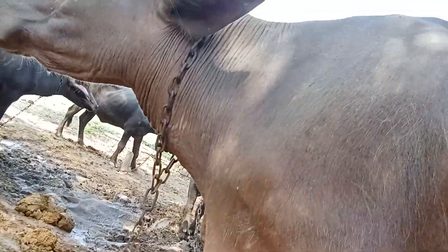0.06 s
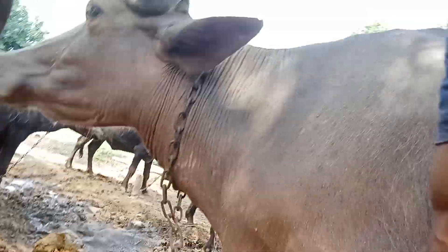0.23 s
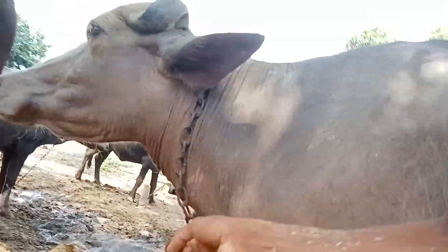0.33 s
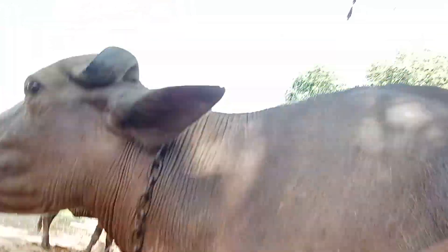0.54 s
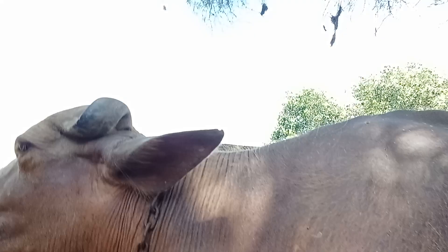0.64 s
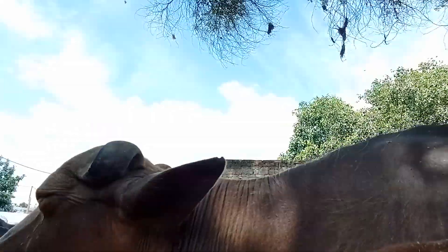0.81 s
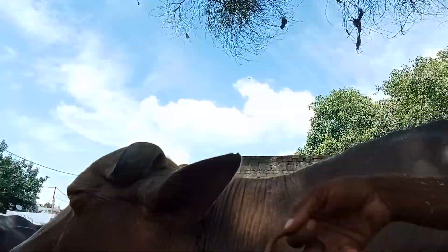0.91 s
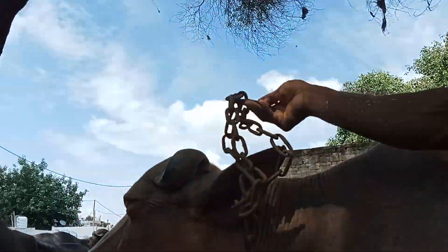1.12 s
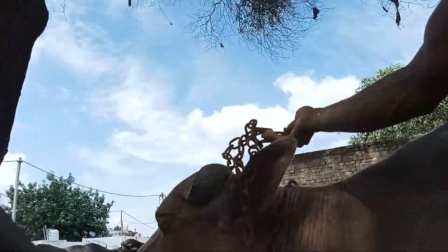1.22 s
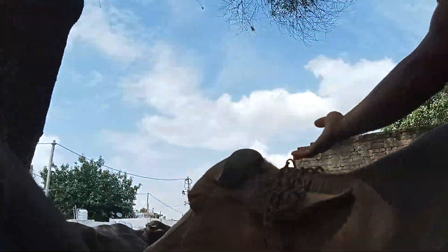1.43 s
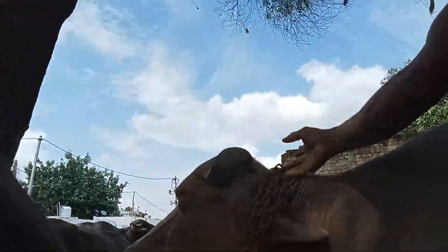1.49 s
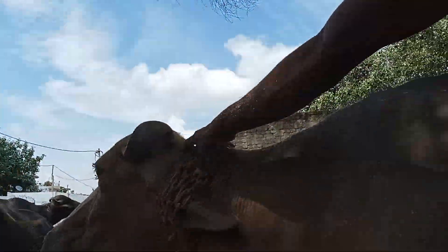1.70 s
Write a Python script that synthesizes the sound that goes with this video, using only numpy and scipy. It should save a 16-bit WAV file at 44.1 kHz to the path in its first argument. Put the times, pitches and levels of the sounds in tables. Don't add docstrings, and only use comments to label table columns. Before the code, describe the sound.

A metal chain rattles and clinks close by, shaken, pulled and tossed in a yard

```python
import sys
import numpy as np
from scipy import signal
from scipy.fft import rfft, irfft
from scipy.io import wavfile

SR = 44100
rng = np.random.default_rng(int(sys.argv[2]) if len(sys.argv) > 2 else 0)


def how_loud(loudness_db):
    steps = np.asarray(loudness_db, float) / 20
    return 10 ** steps


def output_pcm(signal):
    pcm = np.clip(np.atleast_2d(signal).T, -1, 1) * 32767
    wavfile.write(sys.argv[1], SR, np.round(pcm).astype(np.int16))


N = 77175

# start_s, level_db (peak)
SHACKLE_HITS = [(0.0014, -16), (0.0708, -18), (0.1101, -23), (0.1225, -16), (0.1624, -15), (0.1775, -19.5),
                (0.2019, -14.5)]
SLACK_HITS = [(0.2305, -9), (0.3, -29), (0.3868, -8.5), (0.402, -23), (0.5165, -35), (0.5776, -14),
              (0.5948, -12), (0.6072, -15), (0.657, -17.5), (0.6707, -13.5), (0.7031, -23), (0.7221, -14.5),
              (0.752, -20.5), (0.7684, -29.5)]
PULL_HITS = [(0.8044, -19.5), (0.8124, -19), (0.8336, -19.5), (0.864, -20.5), (0.8755, -25), (0.9482, -39),
             (0.9681, -18.5), (0.99, -25), (1.011, -26), (1.0964, -39.5), (1.1282, -30.5), (1.2003, -26.5)]
TOSS_HITS = [(1.213, -10), (1.2512, -17), (1.2554, -10.5), (1.281, -13.5), (1.2924, -16), (1.3202, -23),
             (1.3437, -16), (1.3629, -17), (1.3868, -16.5), (1.4168, -18), (1.4395, -20.5), (1.4636, -14.5)]
SETTLE_HITS = [(1.5152, -28), (1.5379, -22), (1.5723, -23), (1.5894, -32), (1.639, -33.5), (1.6927, -36.5),
               (1.7404, -40)]
# start_s,
# level_db (peak)
SLIPS = [(.2915, -31), (0.5742, -32), (.639, -31.5), (0.665, -27), (.698, -31), (.82, -25.5), (.849, -33),
         (.884, -30), (1.1635, -33)]
# gain_db, or jingle centre pitch_hz
CRACK_GAIN_DB = [-5, -5, 0.5, -1, -7]
TICK_GAIN_DB = [-1, -9, -2, -5.5, 0.5]
JINGLE_GAIN_DB = [-16, -10, -9.5, -14.5, -11.5]
REBOUND_GAIN_DB = [-23, -16, -19, -17, -15.5]
JINGLE_HZ = [11450, 11370, 11400, 12400, 11800]
# start_s, level_db, pitch_hz, t60_s
LINK_RINGS = [(0.001, -40, 14900, 0.2), (0.07, -26.5, 2980, 0.031), (0.071, -27, 12680, 0.044),
              (0.111, -28, 8050, 0.045), (0.123, -30, 10000, 0.056), (0.122, -31, 3120, 0.035),
              (0.123, -27, 14880.0, 0.032), (0.1778, -22.5, 9880, 0.021), (0.203, -18, 3285, 0.023),
              (0.203, -11, 9150, 0.021), (0.232, -27, 9200, 0.049), (0.3, -52, 11700, 0.24),
              (0.301, -48, 10170.0, 0.28), (0.389, -22.5, 11220, 0.21), (0.387, -20, 9490, 0.14),
              (0.388, -22, 9390, 0.3), (0.389, -27, 11850, 0.14), (0.511, -41, 12350, 0.14),
              (0.51, -36.5, 11520, 0.11), (0.58, -29, 9460, 0.27), (0.595, -32, 12370, 0.2),
              (0.609, -21, 11780.0, 0.055), (0.606, -17, 9450, 0.079), (0.659, -29, 9600, 0.12),
              (0.661, -25.5, 11000, 0.21), (0.659, -28.0, 9670, 0.2), (0.722, -40, 8690.0, 0.041),
              (0.723, -27, 10500, 0.07), (0.724, -28, 11700, 0.07), (0.8045, -18, 9460, 0.17),
              (0.864, -27, 9400, 0.09), (0.968, -16.5, 10050, 0.055), (0.97, -19, 11550, 0.034),
              (0.99, -25, 9780, 0.05), (1.0115, -17, 9700, 0.08), (1.011, -21, 11000, 0.1),
              (1.096, -50, 13100, 0.047), (1.128, -16.5, 11240.0, 0.12), (1.127, -15.5, 11430, 0.071),
              (1.164, -38, 8600, 0.022),
              (1.212, -21, 12300, .5), (1.212, -21, 12950, .14), (1.212, -19, 14050, .1),
              (1.217, -32, 9500, .15), (1.257, -18, 13120, .19), (1.257, -23, 13520, .3),
              (1.281, -19, 11200, .04), (1.321, -29, 14050, .09), (1.345, -33, 9750, .2),
              (1.366, -33, 7860, .15), (1.366, -34, 3150, .2), (1.366, -33, 8650, .12),
              (1.366, -24, 13570, .26), (1.383, -17, 13560, .1), (1.383, -27, 12300, .2),
              (1.439, -30, 11150, .05),
              (1.4637, -9.5, 13400, 0.078), (1.493, -45.5, 3310, 0.16), (1.539, -45, 14920.0, 0.095),
                (1.539, -30, 9050, 0.072), (1.541, -35.5, 2884, 0.11), (1.575, -64, 2830, 0.14),
                (1.573, -34.5, 8940, 0.13), (1.588, -39, 14790.0, 0.11), (1.588, -38, 2900, 0.1),
                (1.641, -55, 14780.0, 0.167), (1.641, -42.5, 3280, 0.073), (1.643, -44.5, 9000, 0.14),
              (1.213, -17, 14800, .025), (1.212, -28, 13240, .2), (1.213, -27, 7900, .03),
              (1.251, -17, 11950, .02), (1.268, -16, 13120, .19), (1.2683, -17, 13520, .12),
              (1.261, -32, 9450, .3), (1.293, -24, 9100, .025), (1.305, -29, 9900, .07),
              (1.345, -31, 11050, .1), (1.366, -33, 14870, .2), (1.369, -25, 10070, .025),
              (1.366, -36, 2900, .1), (1.367, -33, 3300, .12), (1.387, -27, 14050, .08),
              (1.387, -34, 14900, .2), (1.392, -23, 13060, .12), (1.421, -33, 11220, .2),
              (1.414, -32, 10000, .1), (1.447, -37, 9500, .12), (1.464, -18, 14940, .045),
              (1.469, -22, 12340, .075), (1.465, -28, 8800, .06), (1.471, -27, 8440, .06),
              (1.465, -27, 14080, .05), (1.478, -33, 11810, .15), (1.54, -36, 7860, .12),
              (1.541, -40, 3320, .08), (0.001, -36, 9950, .15), (0.071, -32, 14950, .09)]
# freq_hz, level_db
CRACK_COLOUR = [(4000, -18.5), (7500, -7.5), (9500, 2.5), (12500, -1.5), (15400, -13)]
TICK_COLOUR = [(800, -14), (2300, -3.5), (4300, 6.5), (7000, -7.5)]
# start_s, level_db (peak), pitch_hz, t60_s
KNOCKS = [
    (0.2311, -8, 3450, 0.022),
    (0.2304, -8.5, 3980, 0.019),
    (0.2335, -16.5, 2200, 0.014),
    (1.2922, -12.5, 4190, 0.013),
    (1.3, -10.5, 2290, 0.0073),
    (1.3, -16, 1050, 0.03),
]
# start_s, level_db (peak), pitch_hz, t60_s
CLATTER = [(0, -28, 93.5, 0.13), (.217, -29.5, 1396, 0.077), (.233, -22.5, 899, .11),
           (0.2317, -23.5, 1246, 0.028), (.236, -24.5, 353, 0.04), (.262, -37, 948, 0.13),
           (.266, -33.5, 1513, 0.038), (.291, -34.5, 956, .12), (.293, -35.5, 449, 0.082),
           (.311, -28.5, 1530, 0.02), (.852, -38.5, 302, 0.096), (0.867, -40, 1643, .045),
           (.903, -33.5, 230, 0.15), (.965, -44.5, 2380, 0.067), (1.2935, -25.5, 545, 0.055),
           (1.303, -26.5, 426, 0.057), (1.3, -23, 3980, 0.011), (1.416, -39, 1070, 0.044),
           (1.521, -38, 74, 0.26)]
# freq_hz, level_db
THUD_COLOUR = [(150, -38), (400, 0.5), (2500, 0.5), (7000, -34)]
# freq_hz, level_db
AIR_COLOUR = [(35, -38), (80, 15), (200, 0.5), (1000, -24.5), (3800, -12), (7000, -42)]
# start_s, level_db
RUB_LEVEL = [(0, -46.5), (.31, -46), (.35, -57.5), (.83, -57), (.9, -49), (.97, -57), (1.3, -54.5),
             (1.75, -58.5)]
# freq_hz, level_db
RUB_COLOUR = [(150, 1), (450, 2), (1200, -4), (6500, -22.5), (11000, -21)]
# multiple (of the turning rate), level_db
ENGINE = [(2, -63.5), (3, -59.5), (4, -59), (5, -57.5)]
# start_s, end_s, pitch_hz, level_db
WHINES = [
    (.54, .8, 710, -61),
    (.85, 1.22, 710, -65),
    (.94, 1.04, 850, -58),
    (1.47, 1.66, 850, -63),
]


def chain():
    stages = [SHACKLE_HITS, SLACK_HITS, PULL_HITS, TOSS_HITS, SETTLE_HITS]
    gains = zip(stages, CRACK_GAIN_DB, TICK_GAIN_DB, JINGLE_GAIN_DB, JINGLE_HZ, REBOUND_GAIN_DB)
    jingles, taps = [], []
    for hits, crack, tick, jingle, hz, rebound in gains:
        for s, db in hits:
            jingles.append((s, db + crack + jingle, hz))
            taps.append((s, db + crack, db + tick))
            for late, weight in rng.random((4, 2)):
                crack_db = db + crack + rebound * (1 + weight)
                tick_db = db + tick + rebound * (0.5 + weight)
                taps.append((s + 0.0064 + 0.035 * late, crack_db, tick_db))
    taps += [(s, db, db) for s, db in SLIPS]
    ringing = rings() + links(jingles)
    cracks = bursts([(s, db, 0.026) for s, db, _ in taps], CRACK_COLOUR)
    ticks = bursts([(s, db, 0.019) for s, _, db in taps], TICK_COLOUR)
    return ringing + cracks + ticks


def rings():
    twin_hz, choke_hz, choke_db_per_s = 118, 450, 1998
    rows = np.array(LINK_RINGS)
    chances = np.resize(rng.random((68, 4)), (len(rows), 4))
    out, t = np.zeros(N), np.arange(12000) / SR
    for (s, db, hz, t60), u in zip(rows, chances):
        near_pitch = abs(rows[:, 2] - hz) < choke_hz
        again = rows[(rows[:, 0] > s + 0.008) & near_pitch, 0]
        stop = again.min() - s if len(again) else 1
        decay = db - 60 * t / t60 - choke_db_per_s * np.maximum(t - stop, 0)
        shape = how_loud(decay) * np.minimum(t / 0.0005, 1)
        twins = np.zeros(len(t))
        for side, v in zip((1, -2), u):
            twins += np.sin(2 * np.pi * ((hz + side * twin_hz * (0.5 + v)) * t + 10 * v))
        twin_db = -10.5 if s < 1.2 else -15
        main = np.sin(2 * np.pi * (hz * t + u[2]))
        add(out, s, shape * (main + how_loud(twin_db) * twins))
    return out


def links(hits):
    spread_hz, bounce_s, longest_t60 = 2500, 0.011, 0.1
    out, t = np.zeros(N), np.arange(5000) / SR
    for s, db, centre_hz in hits:
        u = rng.random((5, 12, 1))
        hz = np.minimum(centre_hz + spread_hz * (u[0] + u[1] - 1), 15600)
        late = np.clip(t - bounce_s * u[2] ** 2, 0, None)
        t60 = longest_t60 * (0.038 + u[4] ** 3)
        waves = how_loud(-14.0 * u[3] - 60 * late / t60) * np.sin(2 * np.pi * hz * late)
        add(out, s, how_loud(db) * waves.sum(0))
    return out


def bursts(hits, colour):
    shape, t = np.zeros(N), np.arange(4000) / SR
    for s, db, t60 in hits:
        add(shape, s, np.minimum(t / 0.00035, 1) * how_loud(db - 60 * t / max(t60, 0.003)))
    return shape * coloured(colour) / 3.04


def knocks():
    tones, t = np.zeros(N), np.arange(8000) / SR
    for s, db, hz, t60 in KNOCKS:
        add(tones, s, how_loud(db - 8.0 - 60 * t / t60) * np.sin(2 * np.pi * hz * t))
    for s, db, hz, t60 in CLATTER:
        onset = np.minimum(t * hz / 1.52, 1)
        add(tones, s, onset * how_loud(db - 60 * t / t60) * np.sin(2 * np.pi * hz * t))
    rough = tones * how_loud(2.5 * wander(160))
    puffs = bursts([(s, db - 5.5, 1.26 * t60) for s, db, _, t60 in KNOCKS], THUD_COLOUR)
    return rough + puffs


def echoes(x):
    t60 = 0.089
    taps = np.zeros(8000)
    at = np.arange(80, 7980, 20)
    taps[at + rng.integers(0, 20, len(at))] = rng.choice([-1., 1.], len(at))
    taps = taps * how_loud(-60 * np.arange(8000) / SR / t60)
    return signal.oaconvolve(x, taps / np.linalg.norm(taps))[:N]


def rubbing():
    level_db = np.interp(np.arange(N) / SR, *np.transpose(RUB_LEVEL))
    return how_loud(level_db + 4.0 * wander(90)) * coloured(RUB_COLOUR)


def engine():
    out, t = np.zeros(N), np.arange(N) / SR
    turns = np.cumsum(41.23 * (1 + 0.012 * wander(6))) / SR
    for multiple, db in ENGINE:
        swell = how_loud(db + 3.64 * wander(11.02))
        out += 1.31 * swell * np.sin(2 * np.pi * (multiple * turns + rng.random()))
    for start, end, hz, db in WHINES:
        gate = np.clip(np.minimum(t - start, end - t) / 0.011, 0, 1)
        swell = how_loud(db + 5.1 * wander(14))
        cycles = np.cumsum(hz * (1 + 0.00578 * wander(3.39))) / SR
        out += gate * swell * np.sin(2 * np.pi * cycles)
    return out


def air():
    return how_loud(-53.5 + 2 * wander(15.0)) * coloured(AIR_COLOUR)


def evened(x):
    return x / np.sqrt(np.mean(x ** 2) + 1e-20)


def coloured(points):
    f, db = np.transpose(points)
    hz = np.fft.rfftfreq(N, 1 / SR)
    shape = np.interp(np.log(hz + 1), np.log(f + 1), db)
    return evened(irfft(rfft(rng.standard_normal(N)) * how_loud(shape), N))


def wander(top_hz):
    t, out = np.arange(N) / SR, np.zeros(N)
    for f in np.geomspace(top_hz / 20, top_hz, 20):
        out += np.sin(2 * np.pi * (f * t + rng.random())) / np.sqrt(f)
    return evened(out)


def add(mix, s, sound):
    part = mix[max(round(s * SR), 0):][:len(sound)]
    part += sound[:len(part)]


def scene():
    near = chain() + knocks()
    scatter = how_loud(-15) * echoes(near)
    yard = air() + rubbing() + engine()
    return (near + scatter + yard)[None]


def band_limit(x):
    return signal.sosfilt(signal.butter(12, 16480, fs=SR, output="sos"), x)


def record(dry):
    edge = signal.firwin(255, 16100, window=("kaiser", 7), fs=SR)
    mix = signal.oaconvolve(dry, edge[None], "same")
    return band_limit(mix)


dry = scene()
out = record(dry)
output_pcm(out)
```